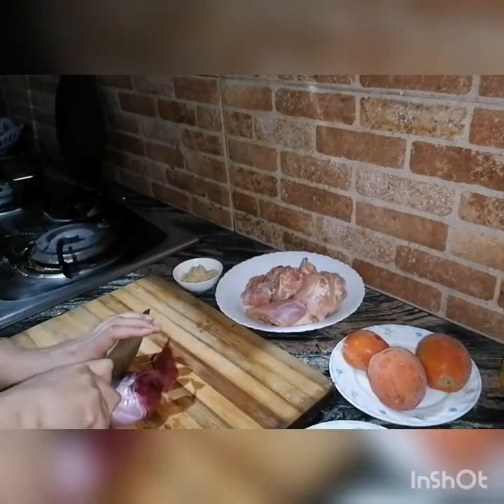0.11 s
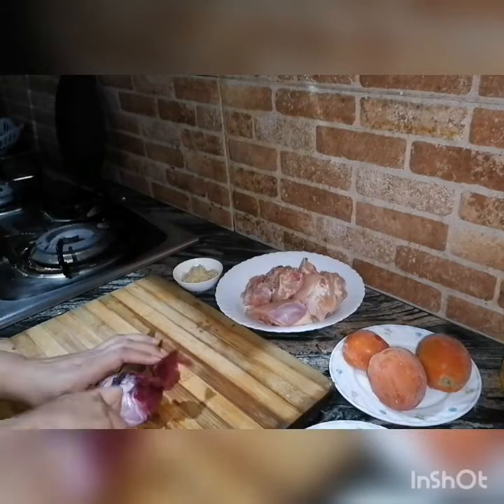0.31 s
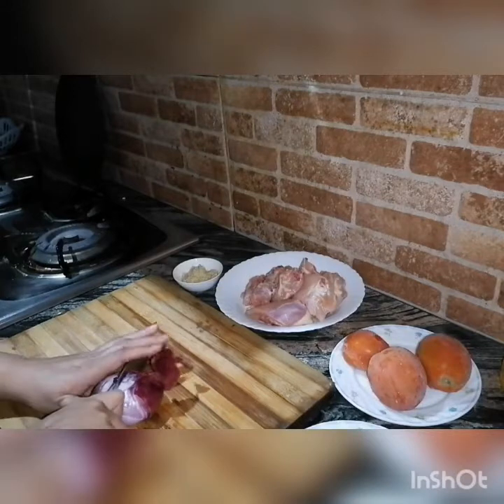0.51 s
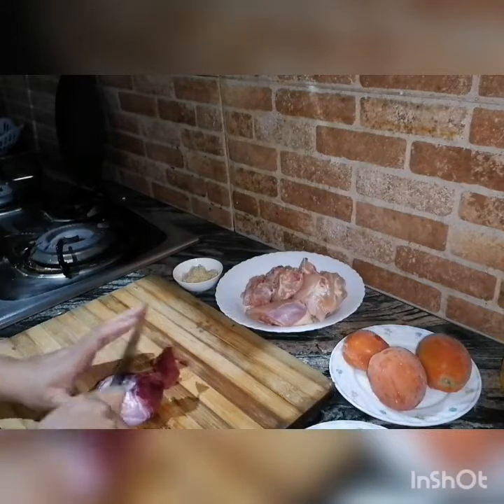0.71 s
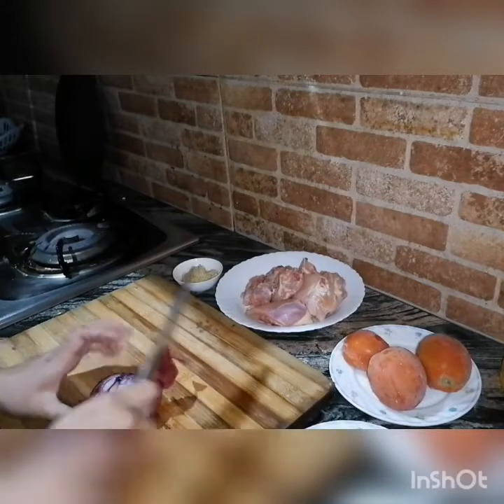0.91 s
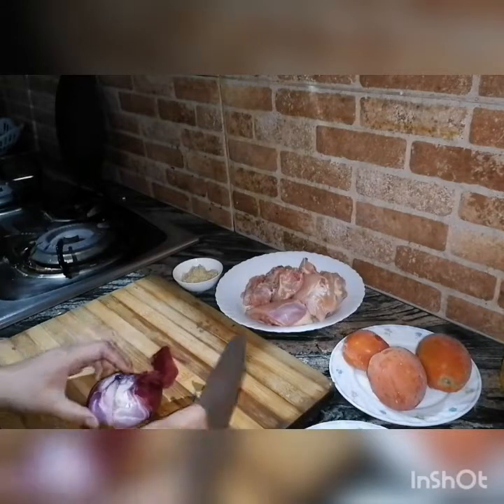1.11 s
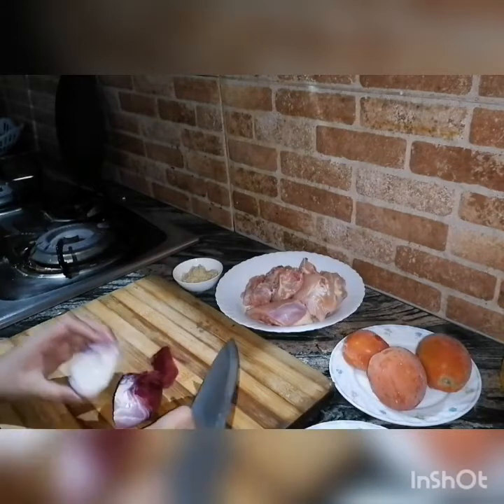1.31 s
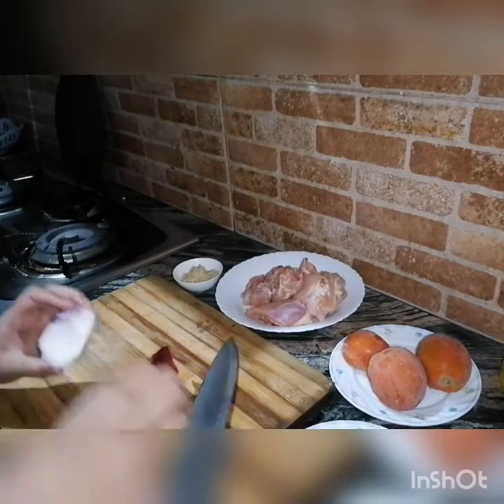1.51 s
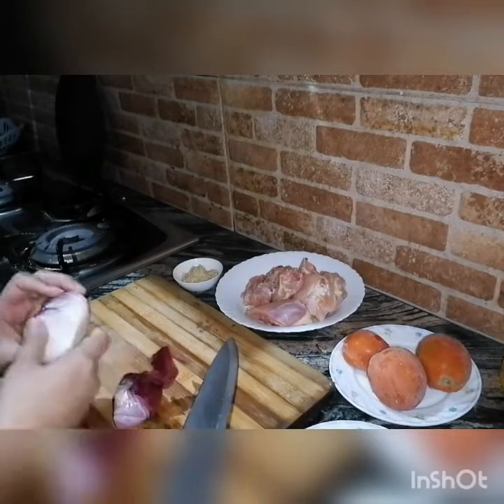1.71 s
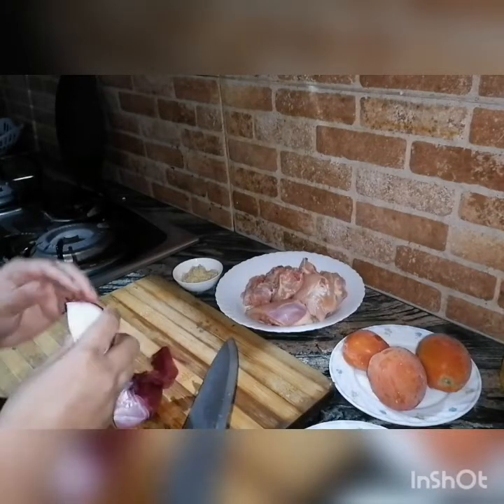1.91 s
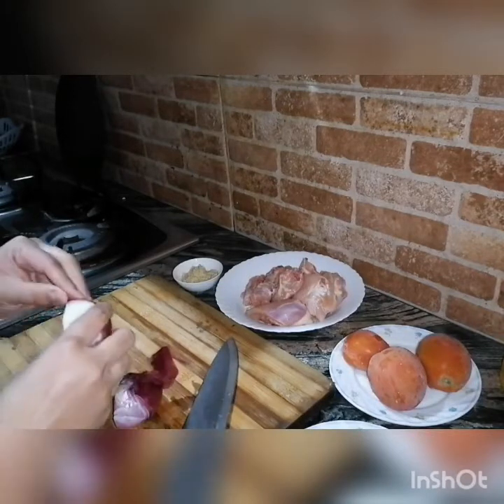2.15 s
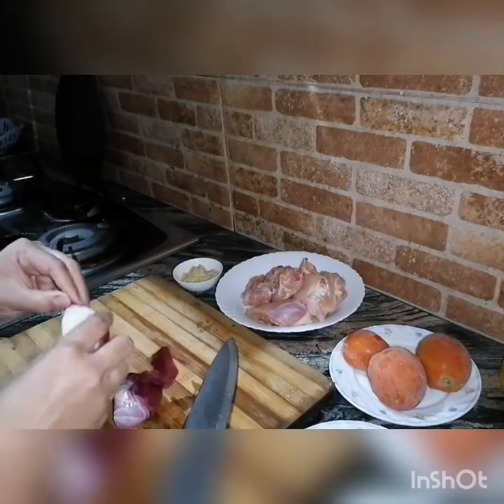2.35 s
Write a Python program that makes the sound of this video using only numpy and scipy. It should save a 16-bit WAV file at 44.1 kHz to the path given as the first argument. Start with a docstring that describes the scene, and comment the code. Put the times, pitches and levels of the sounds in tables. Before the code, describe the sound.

A knife crunches through an onion onto a wooden board, then fingers snap and peel a layer

```python
"""A kitchen knife crunches through an onion (grain stream, thud) and knocks on the wooden board (damped modes).
A faint scrape opens the scene; after the cut the knife is laid down with a hollow knock, slide and ticks.
Fingers snap a layer loose (burst, modes) and peel it off in small crackles; the dry skin rustles (grains).
The hard-walled kitchen (early answers, decaying noise tail) rings after each sound, over air and faint hum."""
import sys
import numpy as np
from scipy import signal
from scipy.fft import rfft, irfft, next_fast_len
from scipy.io import wavfile
from scipy.ndimage import map_coordinates

SR = 44100
rng = np.random.default_rng(int(sys.argv[2]) if len(sys.argv) > 2 else 0)


def waveform_to_disk(signal):
    """Save audio, clipped to [-1, 1], as 16-bit WAV at the path in sys.argv[1]."""
    frames = np.transpose(np.atleast_2d(signal))
    scaled = np.clip(frames, -1, 1) * 32767
    samples = np.round(scaled).astype(np.int16)
    wavfile.write(sys.argv[1], SR, samples)


N = 110250
SIDES = np.array([[.5], [-.5]])  # left, right share of a level or time difference


def amp(db):
    """Decibels to gain."""
    return 10 ** (np.asarray(db) / 20)


def unit(x):
    """Scale to rms 1."""
    return x / np.sqrt(np.mean(x ** 2) + 1e-20)


def along(points, hz):
    """Read (f/Hz, value) points on a log frequency axis."""
    f, v = np.transpose(points)
    return np.interp(np.log(hz + 1), np.log(f + 1), v)


def level(rows):
    """Gain per sample from (t/s, level/dB) rows, silent outside them."""
    s, db = np.transpose(rows)
    return amp(np.interp(np.arange(N) / SR, s, db, left=-200, right=-200))


def wobble(knots_per_s):
    """Smooth random curve through normally distributed knots."""
    return map_coordinates(rng.standard_normal(256), [np.arange(N) * knots_per_s / SR], mode="wrap")


def filtered(x, response):
    """Multiply the spectrum of x by a response of frequency."""
    m = next_fast_len(N + SR // 2)
    return irfft(rfft(x, m) * response(np.fft.rfftfreq(m, 1 / SR)), m)[..., :N]


def coloured(x, colour):
    """Minimum-phase filter through (f/Hz, level/dB) points, by folding the cepstrum."""
    size = 4096
    cepstrum = irfft(np.log(amp(along(colour, np.fft.rfftfreq(size, 1 / SR)))))
    cepstrum[1:size // 2] *= 2
    cepstrum[size // 2 + 1:] = 0
    impulse = irfft(np.exp(rfft(cepstrum)))
    return signal.fftconvolve(x, impulse)[:len(x)]


def add(track, s, sound):
    """Mix a sound into a track at s seconds."""
    start = max(round(s * SR), 0)
    track[start:start + len(sound)] += sound[:N - start]


def spray(t60, click):
    """Click, then a dying scatter of smaller ones; even spectrum, unit energy."""
    t = np.arange(int(min(t60, .3) * SR) + 8) / SR
    x = 1e-3 ** (t / t60) * rng.standard_normal(SR // 3)[:len(t)]
    x[0] = click * np.linalg.norm(x)
    for _ in range(24):  # keep phase, flatten magnitude, truncate
        phase = np.angle(rfft(x, 2 * len(t)))
        x = irfft(np.exp(1j * phase))[:len(t)]
    return x / np.linalg.norm(x)


def burst(colour, t60, click):
    """Coloured spray that starts at about rms 1."""
    sound = coloured(np.pad(spray(t60, click), (0, SR))[:SR // 3], colour)
    return sound / np.linalg.norm(sound) * np.sqrt(t60 * SR / (2 * np.log(1000)))


MODE_SCATTER_DB = 1.5


def ring(modes):
    """Damped modes, weak below their pitch, their levels a little different at every blow."""
    t = np.arange(SR // 3) / SR
    out = np.zeros(len(t))
    for hz, db, t60 in modes:
        decay = 1e-3 ** (t / t60) * np.sin(2 * np.pi * hz * t)
        highpass = signal.butter(2, hz / SR, "high", output="sos")  # corner at hz / 2
        gain = amp(db + MODE_SCATTER_DB * rng.standard_normal())
        out += gain * signal.sosfilt(highpass, decay)
    return out


def grains(colour, per_s, spread_db):
    """Stream of tiny fractures of uneven size, rms 1."""
    sizes = amp(spread_db * np.minimum(rng.standard_normal(N), 2)) * rng.choice([-1, 1], N)
    hits = rng.random(N) < per_s / SR
    return unit(coloured(sizes * hits, colour))


# reverberation time of the kitchen: f/Hz, t60/s
ROOM_T60 = [(100, .3), (300, .53), (800, .62), (1500, .58), (3000, .6), (7000, .53), (11000, .38),
            (16000, .28)]
# spectrum of its tail: f/Hz, level/dB
ROOM_COLOUR = [(100, -15), (400, -1), (780, 1), (3000, 0.5), (7000, -1), (14000, -2.5)]
# stereo balance: f/Hz, left minus right level/dB
LEAN = [(100, -0.5), (380, 4.5), (1000, 4.5), (6000, -0.5), (8500, 2), (14000, -3.5)]
ROOM_BUILD_S, EARLY_T60_S = 0.0016, 0.048
DIRECT_RATIO = 1.1  # direct click over the norm of the early scatter, before whitening


def kitchen(x, tail_db, pan_db, lead_s=0):
    """Direct sound at two microphones, early answers of board and wall, and the room's tail."""
    hz, t, z = signal.stft(rng.standard_normal((2, SR)), SR, nperseg=256)
    decay = 1e-3 ** (t / along(ROOM_T60, hz)[:, None])
    colour = amp(along(ROOM_COLOUR, hz))[:, None]
    tail = signal.istft(z * decay * colour, SR, nperseg=256)[1]
    tail = tail * (1 - np.exp(-np.arange(tail.shape[1]) / SR / ROOM_BUILD_S))
    early = np.array([spray(EARLY_T60_S, DIRECT_RATIO), spray(EARLY_T60_S, DIRECT_RATIO)])

    def answer(response):
        response = response / np.linalg.norm(response[0])
        return signal.fftconvolve(x[None], response, axes=1)[:, :N]

    def ears(f):  # level balance; left leads right by lead_s
        return amp(SIDES * along(LEAN, f)) * np.exp(2j * np.pi * f * lead_s * SIDES)

    near = filtered(answer(early), ears)
    return amp(SIDES * pan_db) * (near + amp(tail_db) * answer(tail))


# room air spectrum: f/Hz, level/dB
AIR = [(20, -4.5), (80, 0), (190, -11), (280, -5.5), (500, -10.5), (1000, -19.5), (2000, -28.5),
       (2900, -27.5), (4000, -37.5), (7200, -27.5), (9000, -37.5), (15000, -34)]
# width of the air: f/Hz, side level/dB
AIR_SIDE = [(120, -6.5), (500, -3), (2000, 1.5)]
# appliance partials: f/Hz, level/dB
HUM = [(97, -88), (146, -78), (441, -86), (495, -73.5)]
AIR_DB, HUM_WAVER_DB, HUM_DRIFT_RAD = -68, 3, .8


def background():
    """Filtered-noise room air and an appliance's hum, wavering in level and phase, balanced by LEAN."""
    t = np.arange(N) / SR
    mid, side = filtered(rng.standard_normal((2, N)), lambda f: amp(along(AIR, f)))
    side = filtered(side, lambda f: amp(along(AIR_SIDE, f)))
    hum = np.zeros(N)
    for hz, db in HUM:
        gain = amp(db + HUM_WAVER_DB * wobble(7)) * np.sqrt(2)
        hum += gain * np.sin(2 * np.pi * hz * t + HUM_DRIFT_RAD * wobble(9))
    both = amp(AIR_DB) * unit(np.array([mid + side, mid - side])) + hum
    return filtered(both, lambda f: amp(SIDES * along(LEAN, f)))


# dry skin under the fingers and blade: t/s, level/dB
RUSTLE = [(0, -51.5), (.05, -63), (.11, -73.5), (.23, -57), (.4, -112), (.66, -82), (.82, -77), (.98, -94),
          (2.03, -87), (2.18, -78.5), (2.35, -82), (2.405, -67.5), (2.44, -100)]
# skin spectrum: f/Hz, level/dB
SKIN_COLOUR = [(300, -11.5), (700, -3), (1500, -13.5), (3000, -3.5), (4000, -10.5), (5400, -5), (7200, 3),
               (9500, -14.5), (15000, -21)]
# soft finger touches on the onion: t/s, level/dB
TOUCHES = [(.01, -52), (.13, -56.5), (0.201, -56.5), (0.827, -67.5)]
# touch spectrum: f/Hz, level/dB
TOUCH_COLOUR = [(70, 10.5), (300, 3.5), (750, 4.5), (1300, -13.5), (4000, -21.5)]
SKIN_GRAINS_PER_S, TOUCH_T60_S = 2500, .12


def handling():
    """Fingers touch the onion (soft bursts) and rub its papery skin (grains)."""
    out = level(RUSTLE) * grains(SKIN_COLOUR, SKIN_GRAINS_PER_S, spread_db=6)
    for s, db in TOUCHES:
        add(out, s, amp(db) * burst(TOUCH_COLOUR, TOUCH_T60_S, click=0.067))
    return kitchen(out, tail_db=-1.0, pan_db=-1.5)


# scrape of the blade: t/s, length/s, level/dB
SQUEAK = (0, .085, -62)
# blade resonances: f/Hz, level/dB, t60/s
BLADE_MODES = [(1540, 0, 0.053), (5250, 0.5, 0.095)]


def squeak():
    """Friction, as noise, keeps the blade's modes ringing for the length of a short scrape."""
    out = np.zeros(N)
    s, length, db = SQUEAK
    stroke = signal.windows.tukey(int(length * SR))
    singing = signal.fftconvolve(rng.standard_normal(SR), ring(BLADE_MODES), "valid")[:len(stroke)]
    add(out, s, amp(db) * stroke * unit(singing))
    return kitchen(out, tail_db=-4.5, pan_db=-2)


# the layer tearing away: t/s, level/dB
TEAR = [(1.48, -38.5), (1.495, -41), (1.53, -49.5), (1.6, -46.5), (1.645, -50), (1.71, -70), (1.93, -73.5),
        (2.02, -86)]
# fibres letting go: t/s, level/dB, treble tilt/dB
CRACKLES = [(1.601, -41.5, 14), (1.623, -45.5, 0), (1.637, -41, -3), (1.683, -41, 0), (1.731, -49.5, -23),
            (1.79, -43, -15), (1.828, -51, -28), (1.887, -49, -18.5)]
# flesh spectrum: f/Hz, level/dB
FLESH_COLOUR = [(130, -19), (255, 3), (380, -6), (540, 11.5), (800, 1), (950, 4), (2300, -8), (2950, -4),
                (3950, -16), (5200, -6), (7600, -8), (10000, -25), (15000, -40)]
# onion in cupped hands: f/Hz, level/dB, t60/s
FLESH_MODES = [(513, -4.5, 0.27), (621, -6, 0.16), (927, -8, 0.23), (1154, -1.5, 0.028), (1856, -7, 0.078),
               (2896, -11.5, 0.049)]
TEAR_JERK_DB, TEAR_JERKS_PER_S = 4.5, 90
FIBRE_T60_S, FIBRE_SPREAD_S, FIBRE_LOSS_DB = 0.013, .014, 2
TREBLE_HALF_HZ = 3100  # half the treble tilt applies here
GRIP_DETUNE = .05  # standard deviation; the shifting grip retunes the onion at every crackle


def peel():
    """The layer tears in jerks; per crackle the onion rings and six fibres part, each weaker than the last."""
    jerks = amp(TEAR_JERK_DB * wobble(TEAR_JERKS_PER_S))
    out = level(TEAR) * unit(jerks * grains(FLESH_COLOUR, per_s=500, spread_db=4.5))
    for s, db, treble_db in CRACKLES:
        colour = [(hz, d + treble_db * hz / (hz + TREBLE_HALF_HZ)) for hz, d in FLESH_COLOUR]
        grip = 1 + GRIP_DETUNE * rng.standard_normal()
        modes = [(hz * grip, mode_db, t60) for hz, mode_db, t60 in FLESH_MODES]
        add(out, s, amp(db - 6) * ring(modes))
        delays = np.sort(rng.uniform(0, FIBRE_SPREAD_S, size=6))
        for k, delay in enumerate(delays - delays[0]):
            fibre = burst(colour, FIBRE_T60_S, click=0.33)
            add(out, s + delay, amp(db - FIBRE_LOSS_DB * k) * fibre)
    return kitchen(out, tail_db=-6, pan_db=4)


# the layer snapping loose: t/s, level/dB, t60/s
SNAP = (1.4795, -24, 0.061)
# snap spectrum: f/Hz, level/dB
SNAP_COLOUR = [(30, -36), (100, -5.5), (330, -10), (600, 6), (1150, -3.5), (1450, -6.5), (3300, -6),
               (4200, -11), (6000, -4.5), (7600, 4), (9000, -8.5), (15000, -18)]
SNAP_RING_DB = -11  # relative to the snap level


def snap():
    """A crisp layer breaks off: a burst that also rings the onion's modes."""
    out = np.zeros(N)
    s, db, t60 = SNAP
    crack = burst(SNAP_COLOUR, t60, click=0.63)
    add(out, s, amp(db) * (crack + amp(SNAP_RING_DB) * ring(FLESH_MODES)))
    return kitchen(out, tail_db=-4.5, pan_db=3.5)


# the blade sliding on the wood as it settles: t/s, level/dB
SLIDE = [(1.27, -58.5), (1.31, -53.5), (1.36, -71), (1.47, -57.5)]
# the knife laid on the board: t/s, level/dB, hollow ring relative to it/dB
KNOCKS = [(1.2475, -4, -2.5), (1.305, -9.5, -29), (1.321, -12, -22), (1.411, -16.5, -20),
          (1.455, -14, -4.5)]
# hollow resonances: f/Hz, level/dB, t60/s
KNOCK_MODES = [(477, -50, 0.23), (613.7, -25, 0.085)]
# contact spectrum: f/Hz, level/dB
KNOCK_COLOUR = [(100, -40.5), (350, -5), (600, 10), (860, 5.5), (1300, -4.5), (3000, -16), (4000, -27.5),
                (5300, -19), (7800, -19), (10000, -38.5)]
KNOCK_TICK_DB, KNOCK_TICK_T60_S = -38.5, 0.084  # tick level relative to the knock level


def knife_down():
    """The knife is set on the board with a hollow knock, then slides and settles with lighter ticks."""
    out = level(SLIDE) * grains(KNOCK_COLOUR, per_s=400, spread_db=3)
    for s, db, ring_db in KNOCKS:
        hollow = amp(ring_db) * ring(KNOCK_MODES)
        tick = amp(KNOCK_TICK_DB) * burst(KNOCK_COLOUR, KNOCK_TICK_T60_S, click=0.38)
        add(out, s, amp(db) * (hollow + tick))
    return kitchen(out, tail_db=-5, pan_db=.5)


# the blade meeting the board: t/s, burst level/dB, t60/s
CHOP = (.278, -14.5, 0.03)
# contact spectrum: f/Hz, level/dB
CHOP_COLOUR = [(150, -42.5), (400, -23), (620, -1), (810, 7), (930, 3), (1080, -4), (1330, 0.5), (1900, -5),
               (3000, -4), (4200, -20), (5500, -11), (7300, -13), (9500, -26.5), (15000, -32)]
# struck resonances: f/Hz, level/dB, t60/s
CHOP_MODES = [(670, -19.5, 0.058), (824, -15.5, 0.035), (922, -17.5, 0.024)]
CUT_LEAD_S = .00012  # cut and chop reach the left microphone first


def chop():
    """The edge lands on the wooden board: contact burst plus damped modes."""
    out = np.zeros(N)
    s, db, t60 = CHOP
    add(out, s, amp(db) * burst(CHOP_COLOUR, t60, click=1.1) + ring(CHOP_MODES))
    return kitchen(out, tail_db=-5.0, pan_db=-1, lead_s=CUT_LEAD_S)


# the blade breaking through the onion: t/s, level/dB
CUT = [(.2355, -53), (.2385, -25.5), (.247, -26), (.258, -33.5), (.277, -39), (.284, -57.5)]
# crunch spectrum: f/Hz, level/dB
CUT_COLOUR = [(300, -31.5), (1300, -9.5), (2000, -14.5), (3100, -2), (4200, -5), (7200, 2), (9200, -13),
              (15000, -13.5)]
# the onion pushed against the board as it gives way: t/s, level/dB, t60/s
THUD = (.240, -29, 0.11)
# thud spectrum: f/Hz, level/dB
THUD_COLOUR = [(40, -32), (90, -19), (140, -1), (220, -4.5), (380, -1), (600, 0.5), (900, -5.5),
               (1500, -25.5), (4000, -36)]


def cut():
    """The blade bursts through the crisp layers (grains) and shoves the onion against the board (thud)."""
    out = level(CUT) * grains(CUT_COLOUR, per_s=4400, spread_db=1.5)
    s, db, t60 = THUD
    add(out, s, amp(db) * burst(THUD_COLOUR, t60, click=0.44))
    return kitchen(out, tail_db=-10.5, pan_db=0.5, lead_s=CUT_LEAD_S)


def scene():
    """All the work on the onion, in the quiet kitchen."""
    hands = handling() + peel() + snap()
    knife = squeak() + knife_down() + chop() + cut()
    return background() + hands + knife


TOP_HZ = 15500


def record(dry):
    """Steep lowpass at the band limit."""
    return filtered(dry, lambda hz: 1 / np.sqrt(1 + (hz / TOP_HZ) ** 160))


dry = scene()
out = record(dry)
waveform_to_disk(out)
```